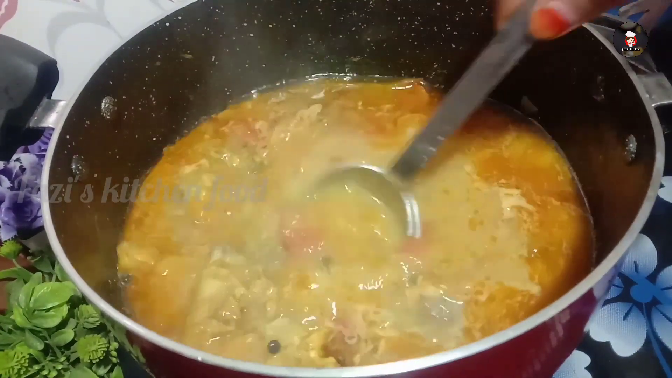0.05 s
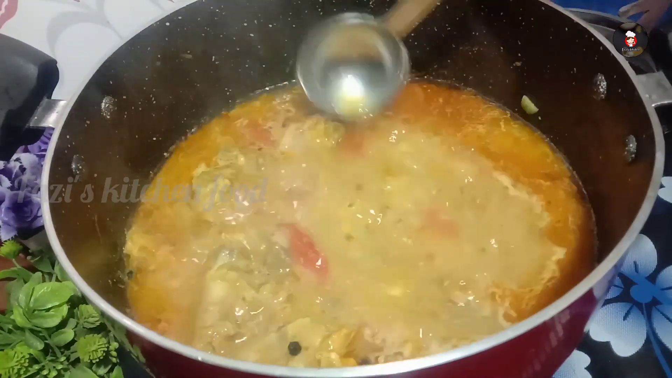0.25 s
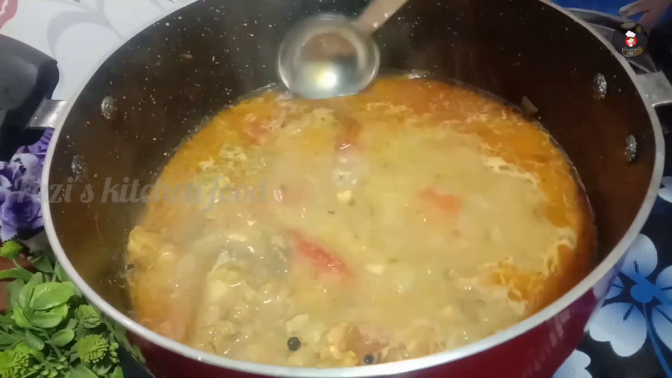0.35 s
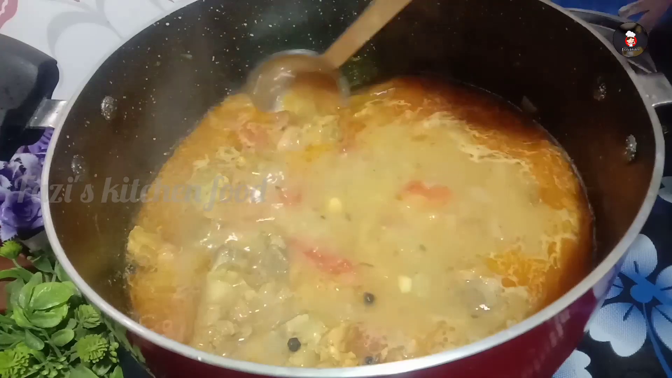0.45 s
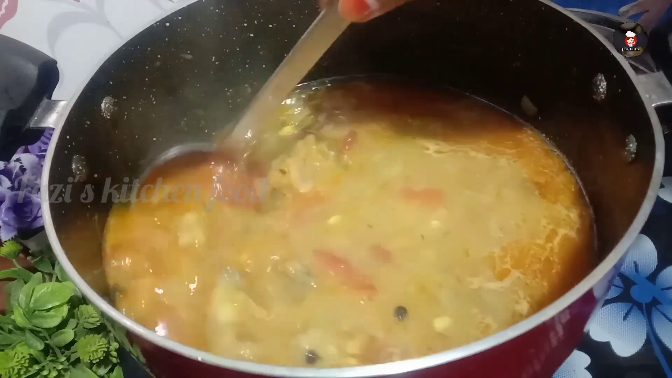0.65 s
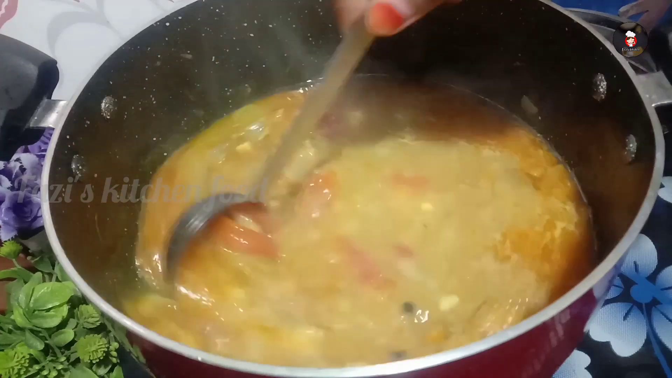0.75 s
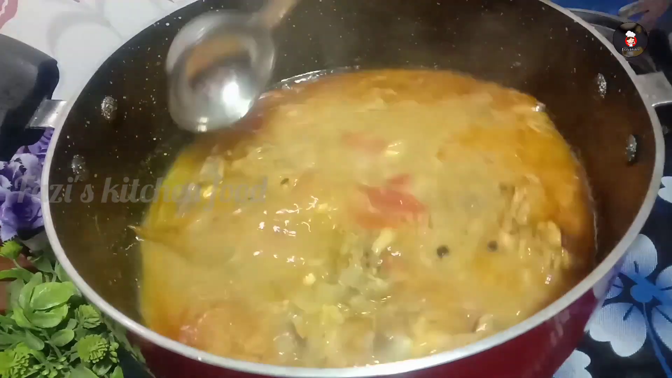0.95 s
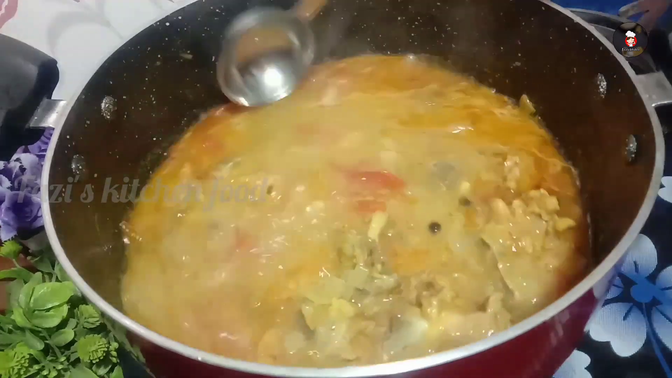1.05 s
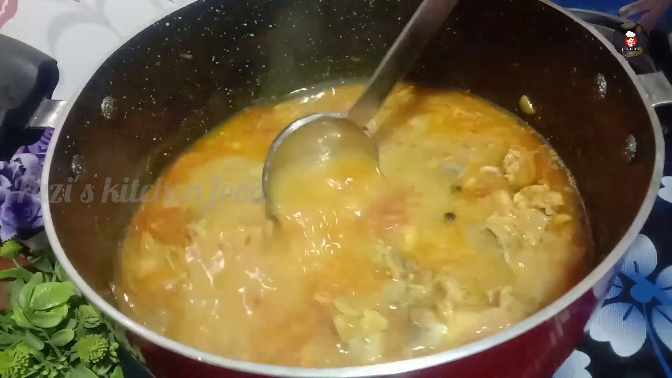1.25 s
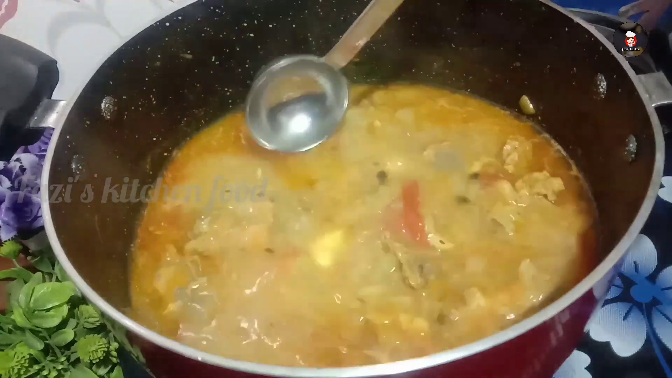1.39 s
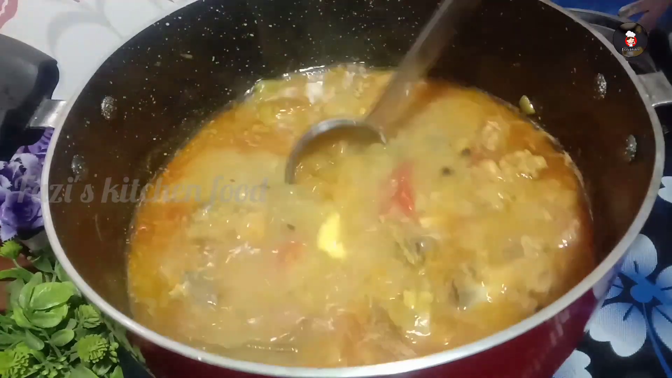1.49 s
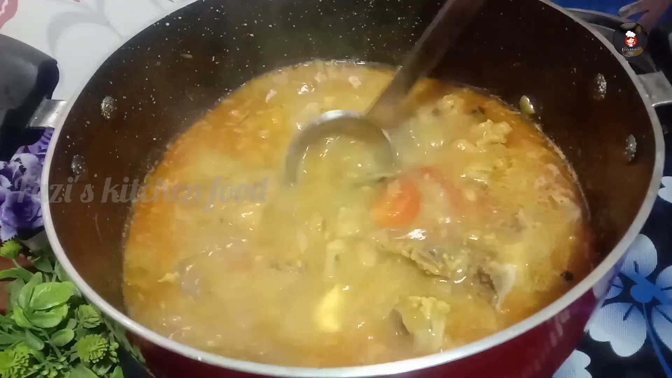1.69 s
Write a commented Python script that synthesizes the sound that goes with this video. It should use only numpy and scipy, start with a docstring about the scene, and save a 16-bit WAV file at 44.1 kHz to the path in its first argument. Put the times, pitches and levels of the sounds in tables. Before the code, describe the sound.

A steel ladle strikes a metal soup pot, heard close in a small room. After faint wet ticks, a hard, bright clank at 0.2 seconds rasps briefly along the wall. A quiet bubble plops near 0.6. A second, higher clink comes at 0.97, then under the soup a soft thud at 1.33 and a firmer, quickly damped double contact at 1.43. Small splats and faint wavering hiss continue.

```python
"""Ladle stirring a pot of soup

A steel ladle stirs thick soup in a metal pot, close by in a small kitchen.
It clanks on the wall, scrapes along it, clinks again, then knocks twice under the soup.
Blows excite decaying modes, dense noise and a low boom of the pot on the stove; slips excite the scrape.
Noise bursts and one decaying tone make the soup's ticks and plops, over a faint, slightly wavering hiss.
"""
import sys
import numpy as np
from scipy import signal
from scipy.fft import rfft, irfft, next_fast_len
from scipy.io import wavfile
from scipy.ndimage import map_coordinates

SR = 44100
rng = np.random.default_rng(int(sys.argv[2]) if len(sys.argv) > 2 else 0)


def dump(signal):
    """Clip the signal to [-1, 1] and save it as 16-bit WAV at the path in sys.argv[1]."""
    limited = np.clip(np.atleast_2d(signal).T, -1, 1)
    pcm = np.round(limited * 32767).astype(np.int16)
    wavfile.write(sys.argv[1], SR, pcm)


N = 74970

# Blows of the ladle; the last two are one close double contact. Shares multiply the modal or band t60.
# start_s, spot (whole part: 0 wall, 1 higher on the wall, 2 under the soup), ring_db, ring_length_share,
# free_ringing_s, stopped_after_s, crack_db, clash_colour (name), clash_db, clash_length_share,
# cutoff_hz, boom_db, boom_hz, boom_t60_s
BLOWS = [(.2227, 0, 0, 1.69, 0.1, .29, -15, "wall", -20, 1.46, 15800, -31, 156, .28),
         (.967, 1, 1.5, 0.95, .18, .33, -27, "high", -18.5, .95, 15600, -32, 174, .46),
         (1.3259, 2, -17, 0.41, 0.026, .09, -39, "soft", -34, 1.1, 3500, -37, 162, .24),
         (1.4253, 2.005, -1.5, 0.37, .03, .09, -19, "sunk", -21, .7, 15900, -36, 157, .27),
         (1.4306, 2, -8, .4, .03, .09, -25, "sunk", -27, .7, 16000, -50, 180, .27)]
# Spectra of the dense, short-lived modes of ladle and pot: frequency_hz, relative_level_db
CLASH_WALL = [(60, -42), (130, -20), (480, -6), (690, -6), (830, -8), (1250, -2), (1800, -13.5), (2150, -4),
              (2800, 1), (3700, -8), (4650, -10), (5400, -10.5), (6300, 0.5), (6800, -9), (7250, -2.5),
              (8400, -14), (9500, -28), (13000, -38), (15300, -29)]
CLASH_HIGH = [(60, -37), (130, -25), (450, -7.5), (690, -11.5), (850, -15.5), (1080, -5), (1300, -14),
              (1600, -2.5), (1800, -13), (2300, -4.5), (2900, -2), (3700, -11.5), (5300, -11.5),
              (6150, -4.5), (7300, -12.5), (9500, -27.5), (13000, -40.5), (15300, -37)]
CLASH_SOFT = [(60, -35), (200, -12), (320, 0), (480, -14), (690, 2), (900, 3), (1400, -2), (1900, 1),
              (2350, -21), (2700, -12), (3200, -13), (3700, -32), (16000, -60)]
CLASH_SUNK = [(60, -42), (220, -21), (365, -2), (900, -2), (1250, -1), (1500, -6), (2000, -6.5),
              (2420, -25.5), (2900, -10.5), (4600, -10.5), (5900, -9.5), (6400, -20.5), (7000, -4),
              (8460, -29), (13000, -46), (15300, -33)]
# Decay of the dense modes before the length share: frequency_hz, t60_s
CLASH_DECAY = [(150, 0.2), (600, 0.099), (2000, 0.067), (6000, 0.074), (14000, 0.048)]
# Clear modes of the pot: frequency_hz
POT_HZ = [335, 393, 574, 684, 905, 968, 1097, 1262, 1386, 1437, 1607, 1987, 2155, 2594, 2708]
# Ringing of each pot mode, before the blow's shares and levels:
# t60_s, wall_level_db, high_wall_level_db, under_soup_level_db
POT_RING = [(1.1, -35, -60, -41), (1.05, -54, -38, -48), (.28, -35, -48, -30), (.26, -28, -37, -25),
            (.1, -42, -48, -18), (.4, -40, -40, -42), (.15, -27, -22, -30), (.13, -26, -40, -17),
            (.12, -29, -44, -32), (.7, -32, -42, -48), (.18, -30, -29, -34), (.32, -25, -32, -38),
            (.14, -35, -35, -46), (.15, -41, -26, -55), (.11, -29, -31, -50)]
# Clear modes of the ladle bowl: frequency_hz
LADLE_HZ = [4215, 4990, 5932, 6120, 6285, 6507, 7070, 7215]
# Ringing of each ladle mode, before the blow's shares and levels:
# t60_s, wall_level_db, high_wall_level_db, under_soup_level_db
LADLE_RING = [(.14, -35, -39, -42), (.12, -35, -35, -38), (.07, -36, -31, -33), (.055, -32, -21, -46),
              (.09, -27, -34, -50), (.08, -27, -38, -50), (.06, -33, -30, -33), (.07, -29, -40, -42)]
# Course of the ladle juddering along the wall after the first blow: time_s, level_db
SCRAPE_LEVEL = [(.228, -40), (.25, -32.5), (.28, -34.5), (.294, -30.5), (.305, -33.5), (.322, -39),
                (.34, -46.5), (.39, -70), (.43, -85)]
# Spectrum of the scrape, before the modal peaks: frequency_hz, relative_level_db
SCRAPE_COLOUR = [(35, -25), (80, -10.5), (156, -3), (210, -13), (390, -3.5), (490, -20), (680, 0.5),
                 (830, -16.5), (1090, -4), (1450, -5.5), (1820, -36), (2100, -8.5), (3000, -20.5),
                 (4700, -29), (6200, -17), (8400, -32), (10000, -49), (16000, -61)]
# Course of the ladle rubbing the pot under the soup: time_s, level_db
RUB_LEVEL = [(1.47, -85), (1.52, -53), (1.58, -45), (1.62, -63), (1.7, -64)]
# Small wet sounds of the soup: start_s, level_db, centre_hz, half_width_octaves, attack_s, t60_s
SPLATS = [(.001, -53, 159, 0.36, 0.001, .2), (.002, -55.5, 670, 0.68, .002, 0.2),
          (.102, -51, 6600, 0.57, 0.00044, 0.086), (0.638, -55, 3200, .55, 0.0022, .13),
          (.705, -54, 6560, .3, 0.016, .22), (.843, -51, 4300, 0.88, .003, 0.096),
          (.888, -46, 850, .5, 0.0076, 0.093), (1.025, -39.5, 700, 0.65, .015, 0.17),
          (1.18, -55, 950, .4, .01, .2), (1.249, -44, 5460, 0.68, .0003, 0.076),
          (1.281, -45, 6960, 0.18, .0005, .04), (1.48, -58, 2200, 1.3, 0.013, 0.37),
          (1.653, -44, 805, 0.64, 0.0041, 0.15)]
# Spectrum of the steady hiss: frequency_hz, relative_level_db
HISS_COLOUR = [(15, -38), (25, -9), (102, -1), (236, -6), (317, -8), (463, -4), (591, -13.5), (734, -10.5),
               (1040, -21.5), (1230, -5.5), (1400, -17.5), (2000, -16.5), (2160, -18), (2760, -23.5),
               (3340, -24), (4870, -22.5), (5280, -23), (6380, -20.5), (7310, -7.5), (9840, -36),
               (13600, -38), (14800, -32.5), (16000, -54)]
# Decay of the room before its stretch: frequency_hz, t60_s
ROOM_DECAY = [(150, .3), (1000, .26), (5000, .22), (14000, 0.3)]

CRACK_ATTACK_S, CRACK_T60_S = 0.00023, 0.016  # the first contact
CLASH_ATTACK_S, CLASH_HOLD_S = 0.0005, 0.0033
RING_ATTACK_S, RING_SPREAD_DB = 0.001, 0.52
DAMPING_DB_PER_S_KHZ = 128  # the soup closing round the ladle damps high modes fastest
STOP_DB_PER_S = 300  # a new touch of the ladle stops the ring
BOOM_DELAY_S, BOOM_ATTACK_S = 0.0075, 0.0088
LOW_CUT_HZ = 82
SLIPS_PER_S = 2200
BUBBLE_S, BUBBLE_HZ, BUBBLE_DB = 0.586, 465, -51
BUBBLE_ATTACK_S, BUBBLE_T60_S = 0.0023, 0.19
HISS_DB, HISS_WAVER_DB, WAVER_POINTS_PER_S = -59, 1.33, 12
WHIR_HZ, WHIR_HALF_WIDTH_OCTAVES, WHIR_DB = 1261, 0.032, -70
ROOM_DELAY_S, ROOM_STRETCH, ROOM_DB, SIDE_DB = 0.012, 0.99, -20, -56
TOP_HZ = 15800


def blows():
    """Impact excitation: each blow is a crack, a dense clash, clear modes and a slower low boom."""
    colours = {"wall": CLASH_WALL, "high": CLASH_HIGH, "soft": CLASH_SOFT, "sunk": CLASH_SUNK}
    out = np.zeros(N)
    for (start_s, spot, ring_db, ring_share, free_s, stop_s, crack_db, colour, clash_db,
         clash_share, cutoff_hz, boom_db, boom_hz, boom_t60) in BLOWS:
        t = since(start_s)
        crack = amp(crack_db) * noise(colours[colour]) * strike(t, CRACK_ATTACK_S, CRACK_T60_S)

        held_t = since(start_s + CLASH_HOLD_S)
        dense = fading(noise(colours[colour]), held_t, CLASH_DECAY, clash_share)
        clash = amp(clash_db) * (1 - np.exp(-t / CLASH_ATTACK_S)) * dense

        ring = amp(ring_db) * modal_ring(t, spot, ring_share, free_s, stop_s)
        out += butter(crack + clash + ring, cutoff_hz, "lowpass", order=8)

        boom = np.sin(2 * np.pi * boom_hz * t) + 0.45 * band(boom_hz, 0.22)
        boom_t = since(start_s + BOOM_DELAY_S)
        out += amp(boom_db) * boom * strike(boom_t, BOOM_ATTACK_S, boom_t60)
    return butter(out, LOW_CUT_HZ, "highpass", order=4)


def modal_ring(t, spot, stretch, free_s, stop_s):
    """Modal superposition: the struck spot weights decaying sines, which the soup then damps."""
    damped_s = np.maximum(t - free_s, 0)
    ring = np.zeros(N)
    for hz, (t60, *spot_levels) in zip(POT_HZ + LADLE_HZ, POT_RING + LADLE_RING):
        level_db = spot_levels[int(spot)] + rng.normal(0, RING_SPREAD_DB)
        damping_db = DAMPING_DB_PER_S_KHZ * hz / 1e3 * damped_s
        tone = np.sin(2 * np.pi * (hz * t + rng.random()))
        ring += amp(level_db - damping_db) * tone * strike(t, RING_ATTACK_S, t60 * stretch)
    return ring * amp(-STOP_DB_PER_S * np.maximum(t - stop_s, 0))


def scrape():
    """Resonant filtering of random slips: they rasp through the modes of pot and ladle."""
    slips = (rng.random(N) < SLIPS_PER_S / SR) * np.sign(rng.standard_normal(N))

    def response(f):
        """Resonance: narrow peaks at the modes stand on the scrape's broad colour."""
        peaks = sum(1.3 / (1 + ((f - hz) / (0.008 * hz)) ** 2) for hz in POT_HZ + LADLE_HZ)
        return (1 + peaks) * amp(along(SCRAPE_COLOUR, f))

    return swell(SCRAPE_LEVEL) * unit(filtered(slips, response))


def rub():
    """Sustained vibration of one mode: rubbing makes the pot's lowest mode hum."""
    hum = unit(np.sin(2 * np.pi * POT_HZ[0] * since(0)))
    return swell(RUB_LEVEL) * hum


def soup():
    """Transient excitation: noise bands make ticks and splats, a decaying sine makes one bubble."""
    wet = np.zeros(N)
    for start_s, level_db, hz, octaves, attack, t60 in SPLATS:
        wet += amp(level_db) * band(hz, octaves) * strike(since(start_s), attack, t60)
    t = since(BUBBLE_S)
    tone = np.sin(2 * np.pi * BUBBLE_HZ * t)
    return wet + amp(BUBBLE_DB) * tone * strike(t, BUBBLE_ATTACK_S, BUBBLE_T60_S)


def kitchen(x):
    """Reverberation: convolution with noise decaying band by band gives a small room's short tail."""
    t = since(ROOM_DELAY_S)
    tail = fading(rng.standard_normal(N), t, ROOM_DECAY, ROOM_STRETCH) * (t > 0)
    return signal.fftconvolve(x, tail / np.linalg.norm(tail))[:N]


def background():
    """Stationary noise: a coloured hiss wavers slightly over a faint narrow-band whir."""
    waver = map_coordinates(rng.standard_normal(40), [since(0) * WAVER_POINTS_PER_S])
    hiss = amp(HISS_DB + HISS_WAVER_DB * waver) * noise(HISS_COLOUR)
    whir = amp(WHIR_DB) * band(WHIR_HZ, WHIR_HALF_WIDTH_OCTAVES)
    return hiss + whir


def strike(t, attack, t60):
    """Impulsive envelope: exponential approach, then exponential decay of 60 dB per t60."""
    return (1 - np.exp(-t / attack)) * amp(-60 * t / t60)


def fading(x, t, t60s, stretch):
    """Frequency-dependent damping: overlapping bands of x decay at their own rates."""
    centres = [hz for hz, _ in t60s]
    out = np.zeros(N)
    for weights, (_, t60) in zip(np.eye(len(t60s)), t60s):
        points = list(zip(centres, weights))
        part = filtered(x, lambda f: along(points, f))
        out += part * amp(-60 * t / (t60 * stretch))
    return out


def noise(colour):
    """Spectral shaping: white noise takes a (Hz, dB) colour at rms 1."""
    return unit(filtered(rng.standard_normal(N), lambda f: amp(along(colour, f))))


def band(hz, octaves):
    """Band-pass filtering: noise of rms 1, its gain halved the given octaves either side of hz."""
    return unit(filtered(rng.standard_normal(N),
                         lambda f: 1 / (1 + (np.log2((f + 1) / hz) / octaves) ** 4)))


def filtered(x, response):
    """Linear filtering: the spectrum of x is multiplied by a response of frequency."""
    m = next_fast_len(N + 8192)
    return irfft(rfft(x, m) * response(np.fft.rfftfreq(m, 1 / SR)), m)[..., :N]


def butter(x, hz, kind, order):
    """Causal Butterworth filtering: low- or high-pass."""
    sos = signal.butter(order, min(hz, SR / 2 - 1), kind, fs=SR, output="sos")
    return signal.sosfilt(sos, x)


def swell(points):
    """Amplitude modulation: gain follows (s, dB) points and is -120 dB outside them."""
    s, db = np.transpose(points)
    return amp(np.interp(np.arange(N) / SR, s, db, left=-120, right=-120))


def along(points, hz):
    """Logarithmic frequency scale: (Hz, value) points are interpolated along it."""
    f, v = np.transpose(points)
    return np.interp(np.log(hz + 1), np.log(f + 1), v)


def since(s):
    """Causality: seconds elapsed since a moment, zero before it."""
    return np.maximum(np.arange(N) / SR - s, 0)


def unit(x):
    """Power normalisation: scale to rms 1."""
    return x / np.sqrt(np.mean(x ** 2) + 1e-20)


def amp(db):
    """Decibel law: level to amplitude gain."""
    return 10 ** (np.asarray(db) / 20)


def scene():
    """Superposition: the sources sum in the middle, and a faint opposed tail adds a trace of width."""
    pot = blows() + scrape() + rub() + soup()
    mid = pot + amp(ROOM_DB) * kitchen(pot) + background()
    side = amp(SIDE_DB) * kitchen(mid)
    return np.array([mid + side, mid - side])


def record(dry):
    """Band limitation: a very steep low-pass removes what lies above the recorder's limit."""
    return filtered(dry, lambda f: 1 / np.hypot(1, (f / TOP_HZ) ** 60))


dry = scene()
out = record(dry)
dump(out)
```